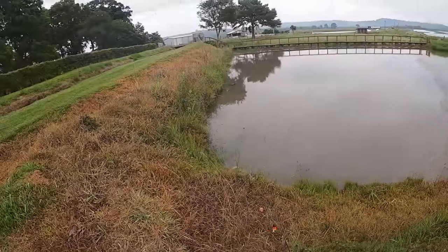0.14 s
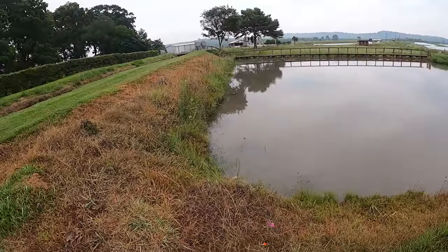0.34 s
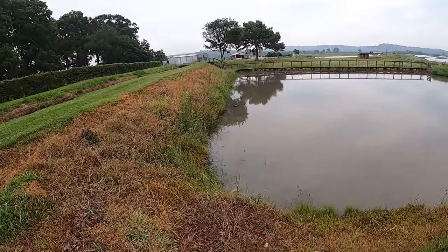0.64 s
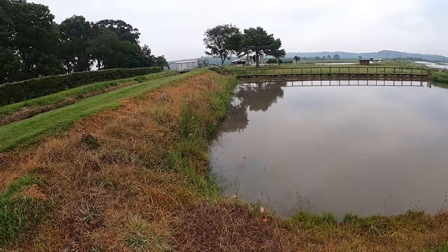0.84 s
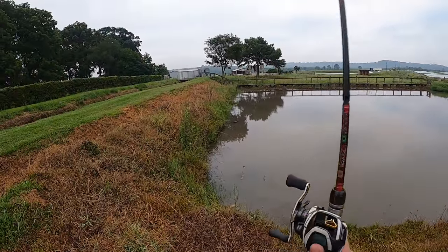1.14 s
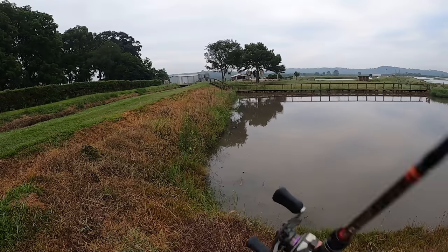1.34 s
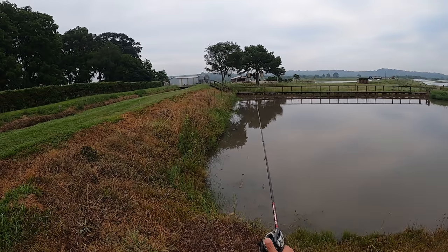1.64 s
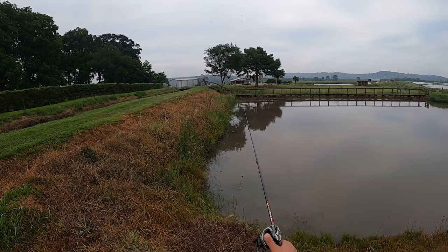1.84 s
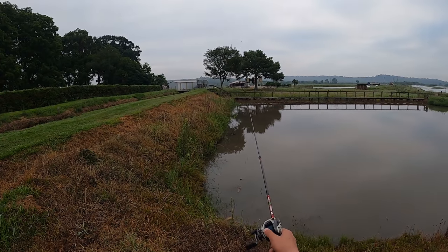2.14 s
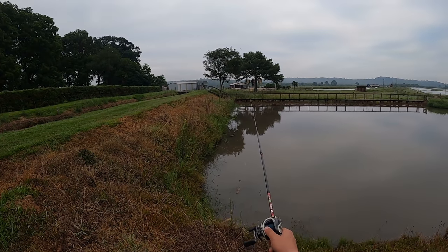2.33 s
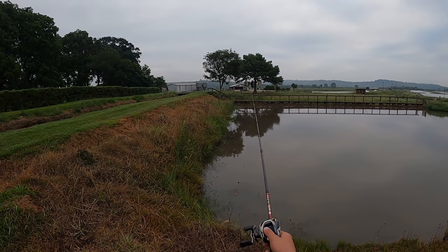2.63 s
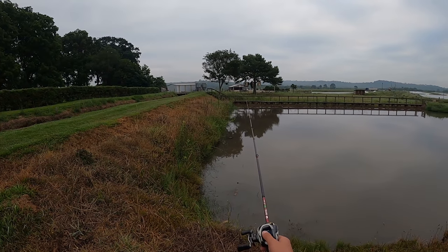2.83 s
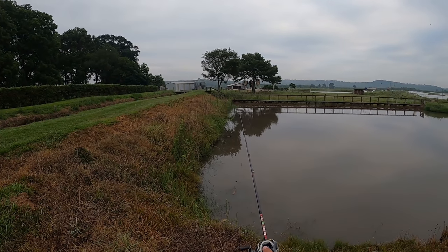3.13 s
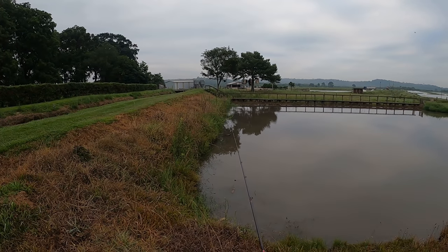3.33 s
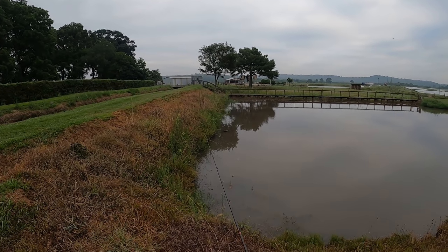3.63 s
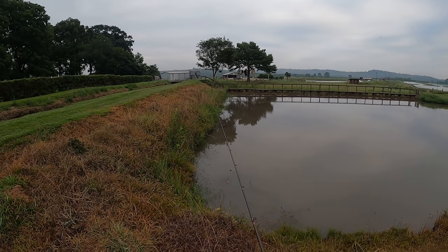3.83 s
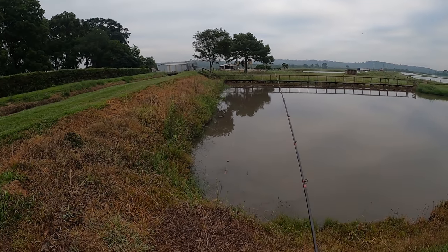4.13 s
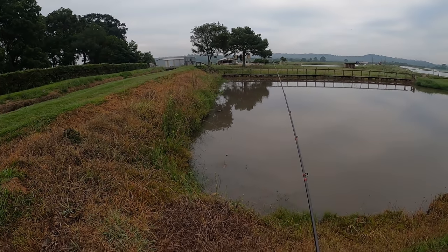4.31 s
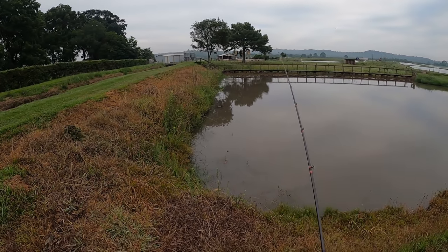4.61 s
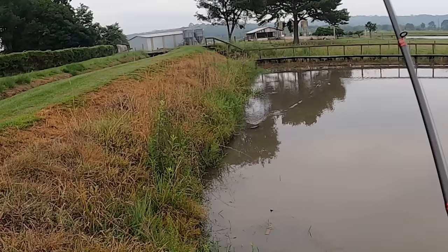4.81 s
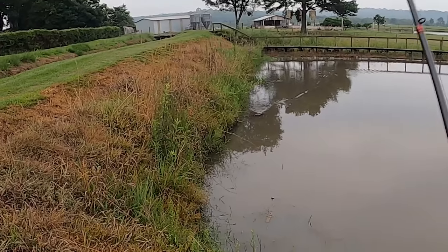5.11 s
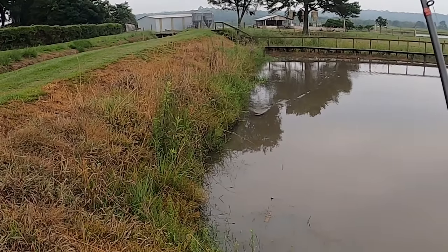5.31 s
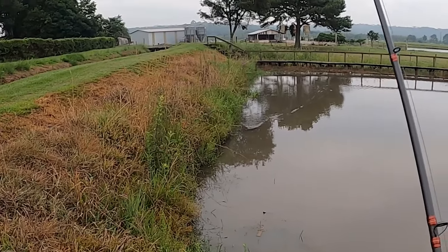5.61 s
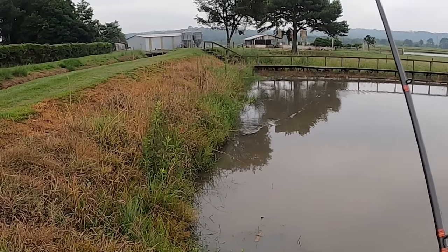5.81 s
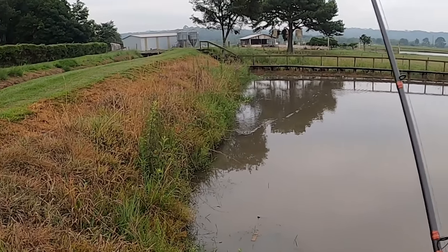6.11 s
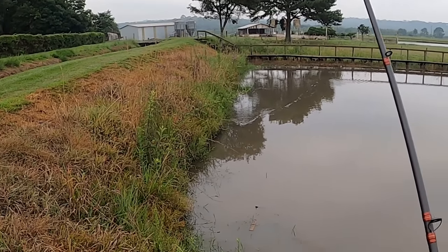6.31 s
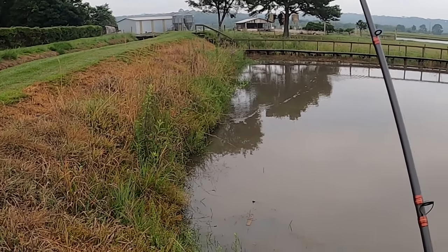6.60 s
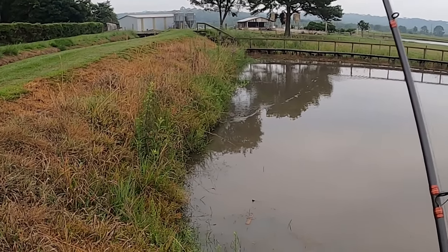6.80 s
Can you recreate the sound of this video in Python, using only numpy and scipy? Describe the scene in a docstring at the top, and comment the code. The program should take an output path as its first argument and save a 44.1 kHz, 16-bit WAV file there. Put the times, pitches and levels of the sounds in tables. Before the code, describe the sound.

Beside a pond, an angler near the microphone clicks a reel and casts: a quick swish, a brief singing of line, and a soft whirr from the spool. The reel then clicks sharply in two short clusters. All the while small birds give short sliding chirps and whistles above a steady, high drone of crickets and distant traffic hum, and light wind rumbles briefly near the end.

```python
"""Many small birds chirp and whistle by a summer pond, each note a single sliding tone.
Close by, an angler clicks a reel and casts: the rod swishes, the line sings and whirrs off the spool.
Crickets trill with quick strokes of their wings. Behind it all far traffic hums,
the grass rustles, and gusts of wind rumble on both microphones."""
import sys
import numpy as np
from scipy import signal
from scipy.fft import rfft, irfft, next_fast_len
from scipy.io import wavfile
from scipy.ndimage import uniform_filter1d, map_coordinates

SR = 44100
rng = np.random.default_rng(int(sys.argv[2]) if len(sys.argv) > 2 else 0)


def transcribe(signal):
    """Save signal, clipped to [-1, 1], as a 16-bit WAV file at the path in sys.argv[1]."""
    frames = np.atleast_2d(signal).T
    limited = np.clip(frames, -1, 1)
    pcm = np.round(limited * 32767).astype(np.int16)
    wavfile.write(sys.argv[1], SR, pcm)


N = 306583


def amp(db):
    """Turn decibels into a number to multiply by."""
    return 10 ** (np.asarray(db) / 20)


def unit(x):
    """Scale x to an average strength (rms) of 1."""
    return x / np.sqrt(np.mean(x ** 2) + 1e-20)


def along(points, hz):
    """Read a table of (pitch_hz, value) between its rows, on a log pitch scale."""
    pitches, values = np.transpose(points)
    return np.interp(np.log(hz + 1), np.log(pitches + 1), values)


def curves(rows):
    """Join the rows of a timed table with straight lines: one curve for each column after the time."""
    times, *columns = np.transpose(rows)
    return [np.interp(np.arange(N) / SR, times, column) for column in columns]


def wobble(rate, size=N):
    """A smooth random curve that passes through `rate` new values a second."""
    return map_coordinates(rng.standard_normal(int(size * rate / SR) + 4), [np.arange(size) * rate / SR])


def tone(hz):
    """A pure tone that follows a changing pitch."""
    return np.sin(2 * np.pi * np.cumsum(hz) / SR)


def filtered(x, response):
    """Multiply each frequency in x by response(hz)."""
    size = next_fast_len(N + SR // 2)
    return irfft(rfft(x, size) * response(np.fft.rfftfreq(size, 1 / SR)), size)[..., :N]


def sides(pan_db):
    """Left and right gains; pan_db is how much louder the left is."""
    return amp(np.array([pan_db / 2, -pan_db / 2]))


def rush(spectrum, likeness, patchy_db):
    """Stereo noise of strength 1 with louder and softer patches; likeness 1 makes both sides the same."""
    cells = signal.stft(rng.standard_normal((2, N)), nperseg=512)[2]
    patches = uniform_filter1d(uniform_filter1d(rng.standard_normal(cells.shape[1:]), 5, 0), 12, 1)
    pair = signal.istft(cells * amp(patchy_db * unit(patches)), nperseg=512)[1][:, :N]

    def colour_and_width(hz):
        angle = np.arccos(np.clip(along(likeness, hz), -1, 1)) / 2
        return amp(along(spectrum, hz)) * [np.cos(angle), np.sin(angle)]

    mid, side = filtered(pair, colour_and_width)
    return unit(np.array([mid + side, mid - side]))


# How alike far sounds are on the left and right: pitch_hz, likeness
FAR_LIKENESS = [(100, 0.97), (250, 0.94), (1500, 0.87), (9000, 0.78)]
# The tone colour of traffic: pitch_hz, relative_db
TRAFFIC_SPECTRUM = [(40, -2), (110, 1), (175, 6.5), (280, 1.5), (500, -11), (900, -49)]


def traffic():
    """Far traffic blends into a low, steady hum."""
    return amp(-56 + .13 * wobble(.55)) * rush(TRAFFIC_SPECTRUM, FAR_LIKENESS, patchy_db=2.5)


# How loud the field is: time_s, level_db
FIELD_LEVELS = [(0, -49), (.07, -53), (1.4, -52.5), (2.8, -51), (3.8, -52.5), (4.9, -50), (6.95, -51.5)]
# Its tone colour: pitch_hz, relative_db
FIELD_SPECTRUM = [(400, -6), (700, -7.5), (1200, 0), (2000, -3), (2800, -4), (5000, -9), (6200, -12.5),
                  (8600, -8), (9300, -27), (11000, -44), (14000, -110)]


def field():
    """Grass and distant birds blur into a soft rustle."""
    level_db = curves(FIELD_LEVELS)[0] + .8 * wobble(7)
    return amp(level_db) * rush(FIELD_SPECTRUM, FAR_LIKENESS, patchy_db=1.6)


# Gusts of wind: time_s, level_db
GUSTS = [(0, -91), (.9, -79), (1.2, -64), (2.2, -60.5), (2.6, -77), (4.9, -90), (5.4, -50), (5.8, -63),
         (6.15, -51), (6.5, -78), (6.82, -38.5), (6.95, -74)]
# Their deep tone colour: pitch_hz, relative_db
GUST_SPECTRUM = [(15, 5), (35, 25), (80, 9), (200, -58)]


def wind():
    """Gusts hit each microphone a little differently and rumble more on the right."""
    lumps = amp(3 * wobble(8) + 3 * np.array([wobble(8), wobble(8)]))
    rumble = unit(lumps * rush(GUST_SPECTRUM, [(30, .3)], patchy_db=.8))
    return amp(curves(GUSTS)[0]) * sides(-3)[:, None] * rumble


# Near crickets: pitch_hz, strokes_per_s, time_of_one_stroke_s, start_s, stop_s, level_ahead_db
CRICKET_SONGS = [(7050, 44.45, 3.757, -1, 4.4, -68), (7900, 45.27, 3.7456, -1, 4.7, -65),
                 (8450, 44.75, 6.002, -1, .4, -66), (8050, 45.37, 5.24, 4.6, 8, -68),
                 (8450, 44.75, 6.002, 4.6, 8, -66)]
# The tone colour of the far crickets: pitch_hz, relative_db
CHORUS_SPECTRUM = [(6900, -120), (7300, -40), (7750, -7), (7980, 0), (8300, -7), (8800, -40), (9300, -120)]
# Where the crickets are heard as the listener turns: time_s, pan_db
CRICKET_PAN = [(0, -4.5), (.6, -1.5), (2.2, 5), (3.7, -3), (4.45, -1.5), (4.8, -7.5), (6.95, -8.5)]


def crickets(fade_db_per_s=30):
    """Each wing stroke is a short tone that rises and falls in pitch; far crickets melt into a hiss."""
    pan_db, = curves(CRICKET_PAN)
    t, near = np.arange(N) / SR, 0
    for hz, rate, stroke_s, start, stop, db in CRICKET_SONGS:
        stroke = ((t - stroke_s) * rate + .015 * wobble(20) + .5) % 1 - .5  # 0 at mid-stroke
        reach = np.clip(stroke / .32, -1, 1)
        pitch = hz * (1 + .005 * wobble(25)) - 500 * reach ** 2
        trill = np.abs(np.cos(np.pi / 2 * reach)) ** .27 * tone(pitch)
        fade_db = fade_db_per_s * np.minimum(0, np.minimum(t - start, stop - t))
        near = near + amp(db + fade_db + 2 * wobble(30)) * unit(trill)
    far = amp(-78) * rush(CHORUS_SPECTRUM, [(8000, .42)], patchy_db=4.5)
    # Both grow louder as they move to the right.
    return sides(pan_db) * (amp(-1.15 * pan_db) * near + amp(-1.9 * pan_db) * far)


def rod_hum(start_s=1.49, length_s=.085, start_hz=130, rise_octaves=4.2):
    """The rod tip hums higher the faster it moves."""
    swing = np.clip((np.arange(N) / SR - start_s) / length_s, 0, 1)
    pitch = start_hz * 2 ** (rise_octaves * swing) * (1 + .2 * wobble(150))
    return amp(-41 + 4.2 * wobble(41.48)) * swing * np.sin(np.pi * swing) * tone(pitch)


# The note of the fishing line: time_s, pitch_hz, level_db
LINE_NOTE = [(1.585, 2250, -99), (1.593, 2350, -28), (1.607, 2700, -32), (1.617, 2700, -47),
             (1.657, 2500, -44), (1.67, 2400, -99)]


def line_song():
    """The line sings as it whips through the rings of the rod."""
    hz, db = curves(LINE_NOTE)
    return amp(db + 3 * wobble(250)) * tone(hz * (1 + .02 * wobble(300)))


# How loud the rod and spool are during the cast: time_s, swish_db, spool_db
CAST_LEVELS = [(1.44, -78, -70), (1.53, -52.5, -80), (1.565, -33, -62), (1.6, -33, -42), (1.65, -49.5, -47),
               (1.75, -55, -54), (2.1, -54.5, -57), (2.45, -91, -61), (3.5, -93, -60), (3.62, -104, -97)]
# The tone colours of the rod's swish and the spool's whirr: pitch_hz, relative_db
SWISH_SPECTRUM = [(120, -25), (400, -9), (1300, -2), (2500, -3), (5000, -9), (15000, -45)]
SPOOL_SPECTRUM = [(800, -12.5), (1550, 5), (3400, -11), (3700, 9.5), (3950, -23), (5500, -9), (6050, 6),
                  (6600, -9), (10000, -14), (15500, -35)]


def cast():
    """The rod cuts the air with a swish, then line peels off the spool with a whirr."""
    swish_db, spool_db = curves(CAST_LEVELS)
    swish = amp(swish_db + 2.5 * wobble(120)) * rush(SWISH_SPECTRUM, [(1000, .9)], patchy_db=.9)
    whirr = rush(SPOOL_SPECTRUM, [(1000, .9), (9000, .3)], patchy_db=1.2)
    return swish + amp(spool_db + 2.2 * wobble(40) + 3 * wobble(300)) * whirr


# The tones the reel rings with: pitch_hz, relative_db, ring_s (time to fade by 60 dB)
REEL_TONES = [(930, 5, 0.018), (1366, 11, 0.014), (2050, -2, .006), (2600, -4, 0.012), (3050, 0, 0.014),
              (3870, 3, 0.0052), (4270, 1.5, 0.0021), (5500, -5, 0.008), (6560, 0, 0.0021)]
# Its clicks: start_s, level_db, knock_db (the dull tones compared with the bright ones)
REEL_CLICKS = [(0.283, -34.5, 15), (0.54, -31.5, 2), (0.8046, -10.5, -14), (.81, -22, -14),
               (1.465, -37, 23), (1.49, -31, 4), (1.5657, -15.5, -33), (1.5743, -9.5, -27),
               (1.5757, -13, -39), (1.5845, -8.5, -36), (1.592, -16, -37), (1.596, -15, -31),
               (1.603, -16.5, -35), (1.61, -25.5, -30), (1.797, -30.5, 16), (1.988, -28.5, 28),
               (3.402, -19, -17), (3.4071, -21, -21), (3.4171, -22.5, -22), (3.435, -35, -19),
               (3.451, -32, -1), (3.456, -29.5, 4), (3.479, -22.5, -9), (4.2049, -12.5, -2.5),
               (4.211, -22, -17), (4.22, -6.5, -13), (4.281, -33, 32), (5.2, -40.5, -4)]


def reel(low_cut_hz=774):
    """Each click rings the reel's tones at new strengths; those under 2 kHz make a dull knock."""
    out, t = np.zeros((2, N + SR)), np.arange(1200) / SR
    hz, tone_db, ring_s = np.transpose(REEL_TONES)[:, :, None]
    for start, db, knock_db in REEL_CLICKS:
        blow_db = tone_db + np.where(hz < 2000, knock_db, 0) + 1.5 * rng.standard_normal(hz.shape)
        grip = 1 + .05 * rng.standard_normal(hz.shape)  # the hand shifts each pitch
        # Higher tones differ more between left and right.
        level_shift, phase_shift = rng.standard_normal((2, 2, len(hz), 1)) * hz / 9000
        fade = amp(blow_db + 3.5 * level_shift - 60 * t / ring_s)
        ring = fade * np.sin(2 * np.pi * hz * grip * t + .2 * phase_shift)
        rattle = 1 + .5 * wobble(1800, size=len(t))  # loose parts shake as they ring
        click = ring.sum(axis=1) * rattle * (1 - np.exp(-t / .00011))
        click += amp(-9) * np.roll(click, 55, axis=1)  # the part bounces once
        click /= np.abs(click.mean(axis=0)).max()
        noise = rng.standard_normal((2, len(t)))
        grit = noise - np.roll(noise, 3, axis=1)  # strong near 7 kHz
        snap = amp(-31.5 - .17 * knock_db - 60 * t / .046) * grit
        out[:, round(start * SR):][:, :len(t)] += amp(db) * (click + snap)
    # The reel is too small to give off much bass.
    return filtered(out[:, :N], lambda f: (1j * f / (low_cut_hz + 1j * f)) ** 2)


# The echo from trees and banks: pitch_hz, ring_s (time to fade by 60 dB)
BANK_RING_TIMES = [(1000, 0.13), (4000, 0.26), (9000, 0.14)]


def bank_echo(x):
    """Trees and banks throw the sound back; each pitch dies away at its own speed."""
    hz, t, cells = signal.stft(rng.standard_normal((2, SR // 2)), SR, nperseg=256)
    fade = amp(-60 * t / along(BANK_RING_TIMES, hz)[:, None])
    tail = signal.istft(cells * fade, SR, nperseg=256)[1]
    return signal.fftconvolve(x, tail / np.linalg.norm(tail[0]), axes=1)[:, :N]


def far_chatter(count=110):
    """Faint held and falling notes from birds in far trees."""
    for when, length, height, loudness, side in rng.random((count, 5)):
        glide = np.linspace(1, 1 - .28 * side ** 2, round((.0309 + .074 * length) * SR))
        yield when * N / SR, (2500 + 4000 * height) * glide, -70 + 7 * loudness, 12 * side - 4


# Bird whistles: start_s, length_s, held_hz, end_hz, level_db, pan_db
BIRD_WHISTLES = [(2.701, 0.27, 2657, 2284, -47, 4), (6.277, 0.19, 1336, 1205, -58, 14),
                 (3.054, 0.21, 1920, 1960, -55.5, 2), (5.351, 0.065, 5810, 5760, -45, 3),
                 (5.544, 0.055, 2665, 2650, -52.5, 17), (5.602, 0.21, 1429, 1360, -53.5, 8),
                 (6.258, 0.25, 2646, 1900, -44, 11.5), (6.786, 0.73, 1397, 1370, -54, 4)]


def whistles(slide_s=.023, sag_db=3, tire_db=4):
    """A bird slides up to a held pitch and bends it at the end; the note sags midway and ends softer."""
    for start, length, held_hz, end_hz, db, pan_db in BIRD_WHISTLES:
        t = np.arange(round(length * SR)) / SR
        done = t / length
        hz = held_hz * (1 - .28 * np.exp(-t / slide_s)) - (held_hz - end_hz) * done ** 10
        yield start, hz, db - sag_db * np.sin(np.pi * done) - tire_db * done, pan_db


# Arched bird calls: start_s, length_s, start_hz, top_hz, top_at (0 to 1), end_hz, level_db, pan_db
BIRD_ARCHES = [(0.34, 0.22, 2040, 2573, 1, 2500, -52.5, 4),
               (0.497, 0.053, 2850, 3190, 0.26, 2270, -48.5, 0),
               (0.639, 0.057, 4790, 5080, 0.7, 5080, -47, 0),
               (1.816, 0.19, 1944, 2440, 0.53, 2330, -56.5, 0),
               (2.487, 0.066, 1600, 1780, 0.3, 1410, -53, 6),
               (2.496, 0.054, 3080, 3600, 0.44, 3300, -51, 11),
               (3.036, 0.031, 7170, 7300, 0.28, 6400, -39.5, 5),
               (3.274, 0.04, 6400, 6560, 0.4, 5700, -49.5, -3),
               (3.762, 0.07, 2810, 3240, 0.24, 2150, -48, 5),
               (3.943, 0.21, 2184, 2820, 0.57, 2650, -55.5, 0),
               (4.499, 0.067, 4330, 4760, 0.25, 3760, -51.5, 7),
               (4.811, 0.097, 4120, 4720, 0.28, 3590, -43.5, 8),
               (5.132, 0.077, 3760, 4840, 0.37, 3420, -41.5, 5.5),
               (5.661, 0.045, 3140, 3250, 0.264, 1980, -47, 10),
               (6.042, 0.072, 2710, 3420, 0.4, 3000, -47.5, 13.5),
               (6.047, 0.039, 4770, 5300, 0.53, 5050, -54, 12),
               (6.353, 0.11, 6600, 6700, 0.55, 6050, -64, 8),
               (6.558, 0.056, 2990, 3350, 0.33, 2250, -45, 10),
               (6.705, 0.12, 2800, 3390, 0.14, 3377, -48, 9),
               (6.748, 0.19, 2300, 2760, 0.54, 2740, -53.5, 0)]


def arched_calls(soft_start_db=4):
    """A bird swells as it climbs to its top pitch; most calls then fall again."""
    for start, length, start_hz, top_hz, top_at, end_hz, db, pan_db in BIRD_ARCHES:
        past_top = np.arange(round(length * SR)) / SR / length - top_at
        rise = np.maximum(-past_top / top_at, 0)
        fall = np.maximum(past_top, 0) / max(1 - top_at, 1e-9)
        hz = top_hz - (top_hz - start_hz) * rise ** 2 - (top_hz - end_hz) * fall ** 1.7
        yield start, hz, db - soft_start_db * rise, pan_db


# Bird chirps, and at 3.373 s a short rattle of the reel played the same way: start_s, length_s, start_hz,
# end_hz, level_db, pan_db
BIRD_CHIRPS = [(0.076, 0.056, 5900, 3360, -52, 0), (0.106, 0.052, 3270, 2780, -51.5, -1),
               (0.193, 0.033, 6200, 4730, -55, 0), (0.293, 0.065, 7000, 4200, -47.5, 1),
               (0.294, 0.041, 1895, 1703, -40, 0), (0.299, 0.035, 2270, 1980, -38.5, 0),
               (0.614, 0.019, 4300, 3600, -53.5, 0), (0.683, 0.066, 2336, 2620, -52.5, 0),
               (0.78, 0.095, 6740, 3550, -45.5, 1), (0.89, 0.032, 6700, 5460, -54, 0),
               (1.097, 0.075, 4760, 3300, -52.5, 1), (1.384, 0.027, 6600, 5050, -47.5, 1),
               (1.477, 0.032, 6190, 5000, -48, 0), (2.054, 0.08, 1855, 1616, -52, 2),
               (2.136, 0.03, 3390, 2300, -47, 3), (2.279, 0.036, 5620, 2920, -51, 2),
               (2.47, 0.046, 6700, 3960, -47, 2), (2.539, 0.075, 3280, 1956, -45.5, 4.5),
               (2.841, 0.061, 7870, 3010, -45.5, 1), (2.892, .016, 5800, 4900, -51, 6),
               (3.346, 0.025, 4600, 3400, -50, 1), (3.373, 0.071, 3350, 3150, -50.5, 2),
               (4.537, 0.016, 6300, 5970, -49.5, 2), (4.605, 0.026, 6240, 4000, -54, 9),
               (4.939, 0.051, 6260, 4890, -53, 3), (5.031, 0.053, 6750, 4530, -52, 9),
               (5.051, 0.024, 6560, 4710, -46.5, 0), (5.201, 0.022, 4760, 4030, -44.5, 14),
               (5.302, 0.054, 7250, 6500, -55, 0), (5.346, 0.037, 6000, 3000, -49.5, 11),
               (5.452, 0.016, 3580, 4880, -44.5, 5), (5.471, 0.063, 6440, 3330, -46, 6.5),
               (5.523, 0.014, 4940, 3900, -55, 4), (5.593, 0.11, 3450, 3450, -53.5, 21),
               (5.599, 0.078, 1763, 1700, -56, 17), (5.624, 0.037, 5240, 3500, -47, 5),
               (5.766, 0.016, 3220, 5060, -46.5, 7), (5.826, 0.017, 4450, 3240, -40.5, 7),
               (5.898, 0.041, 4950, 3950, -46.5, 5), (6.057, 0.027, 1700, 1724, -50, 12),
               (6.077, 0.011, 3600, 5070, -51, 11), (6.097, 0.076, 3130, 1888, -43.5, 10.5),
               (6.135, 0.027, 4180, 2940, -43.5, 13.5), (6.204, 0.069, 5070, 4770, -55.5, 8),
               (6.313, 0.023, 5980, 5000, -48.5, 2), (6.38, 0.012, 3630, 4840, -46, 7),
               (6.439, 0.013, 3860, 3550, -44.5, 10), (6.446, 0.011, 4920, 3660, -47, 6),
               (6.564, 0.033, 6100, 3830, -47.5, 2), (6.758, 0.062, 6700, 4180, -48.5, 4)]


def chirps(ease_cycles=210, swell_db=.3):
    """A quick slide, usually downward, that slows and grows slightly louder as it goes."""
    for start, length, start_hz, end_hz, db, pan_db in BIRD_CHIRPS:
        t = np.arange(round(length * SR)) / SR
        glide = 1 - np.exp(-t * start_hz / ease_cycles)
        hz = start_hz + (end_hz - start_hz) * glide / glide[-1]
        yield start, hz, db + swell_db * (2 * t / length - 1), pan_db


def bird_voice(hz):
    """A sliding tone: moving air makes it flutter, and near echoes break fast slides into beads."""
    size = len(hz)
    t = np.arange(size) / SR
    voice = tone(hz * (1 + .006 * wobble(200, size)))
    soft_edges = np.sin(np.pi / 2 * np.minimum(1, np.minimum(2 * t, t[-1] - t) / .004))
    slide_speed = np.tanh(np.abs(np.gradient(hz)) * SR / 20000)
    beads_db = 5.5 * slide_speed * (np.tanh(wobble(240, size)) - .3)
    return soft_edges * amp(2 * wobble(80, size) + beads_db) * voice


def birds():
    """Every note, far and near, is sung at its own time and place between left and right."""
    out = np.zeros((2, N + SR))
    for start, hz, db, pan_db in [*far_chatter(), *whistles(), *arched_calls(), *chirps()]:
        out[:, round(start * SR):][:, :len(hz)] += sides(pan_db)[:, None] * amp(db) * bird_voice(hz)
    return out[:, :N]


def scene():
    """Birdsong carries a late echo, blurred by moving leaves; the reel is near and has almost none."""
    song, clicks = birds(), reel()
    song += amp(-19) * np.roll(song, 2100, axis=1)  # one clear echo follows each note
    blurred_song = amp(-5.5) * np.roll(song, 900, axis=1) * unit(wobble(350))
    echoes = bank_echo(blurred_song + amp(-25) * clicks)
    background = traffic() + field() + wind() + crickets()
    angler = rod_hum() + line_song() + cast() + clicks
    return background + angler + echoes + song


def record(dry, top_hz=15850):
    """Sound reaches the left microphone one sample late, and nothing above top_hz is kept."""
    delay_s = np.array([[1], [0]]) / SR
    return filtered(dry, lambda hz: (hz < top_hz) * np.exp(-2j * np.pi * hz * delay_s))


dry = scene()
out = record(dry)
transcribe(out)
```